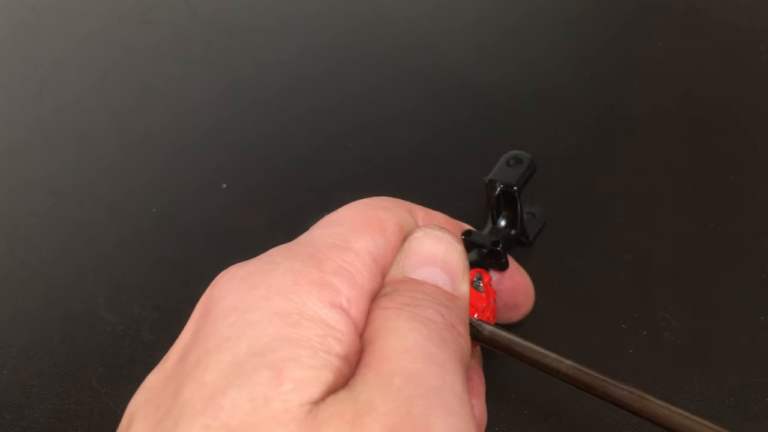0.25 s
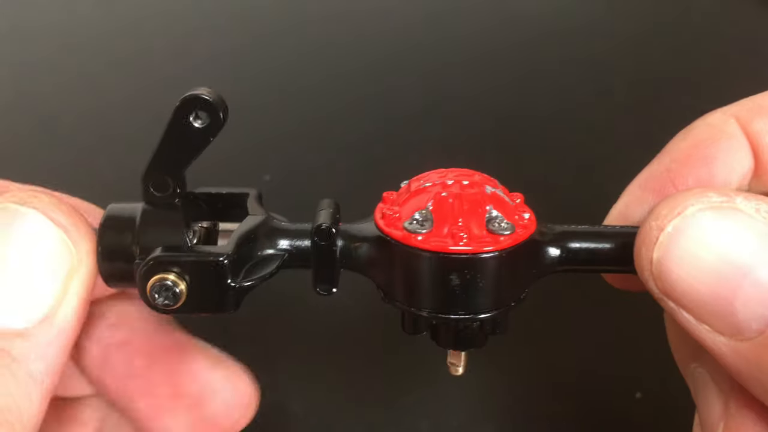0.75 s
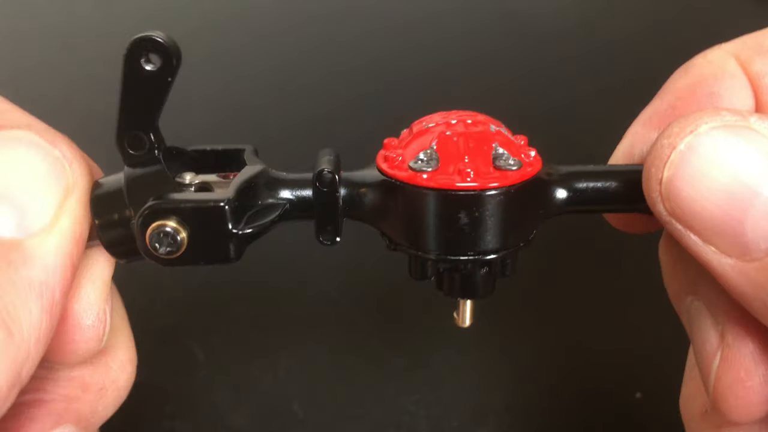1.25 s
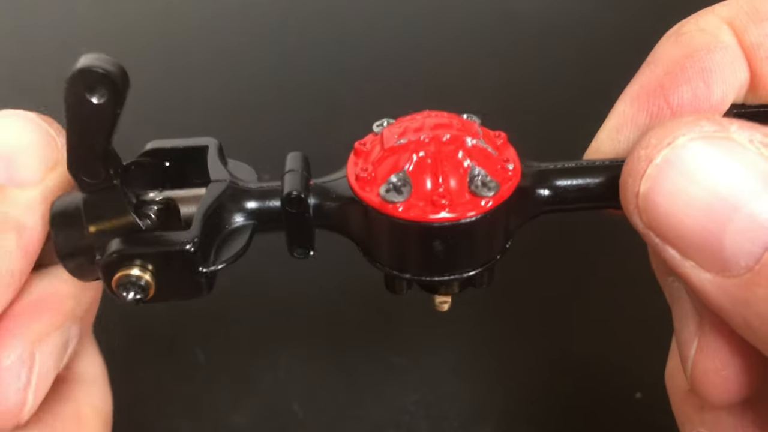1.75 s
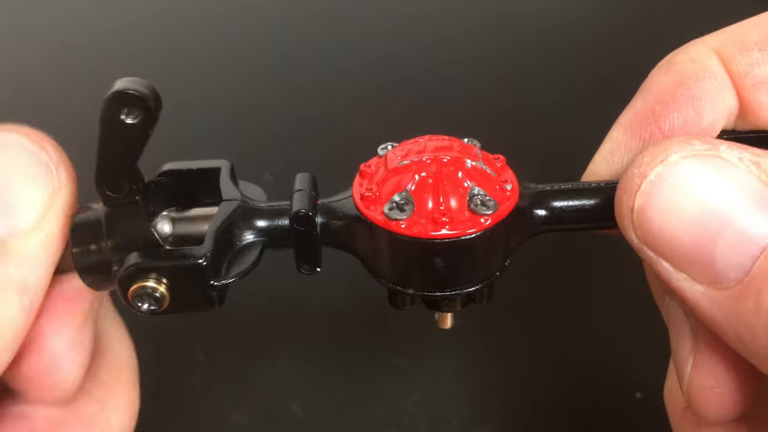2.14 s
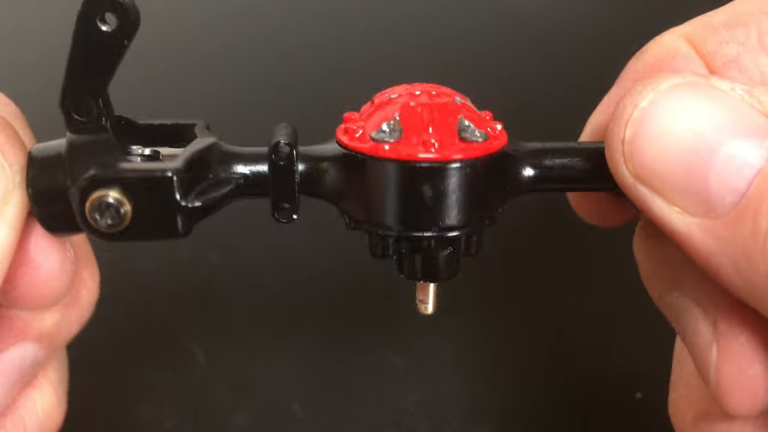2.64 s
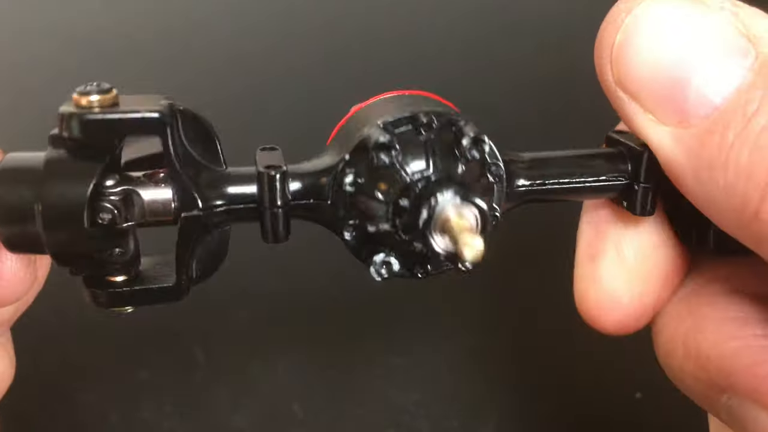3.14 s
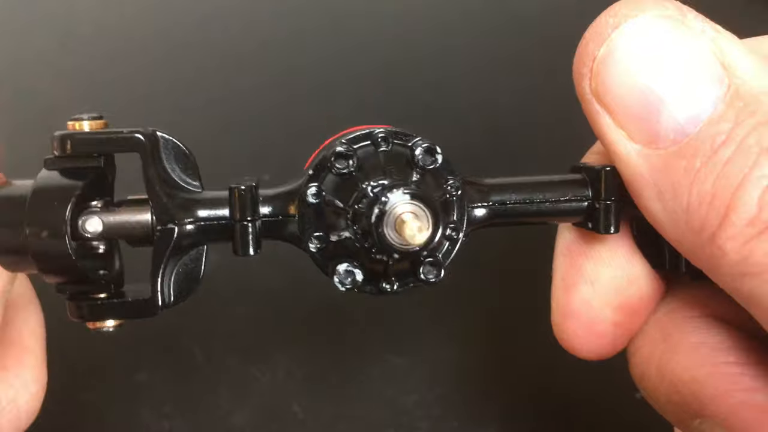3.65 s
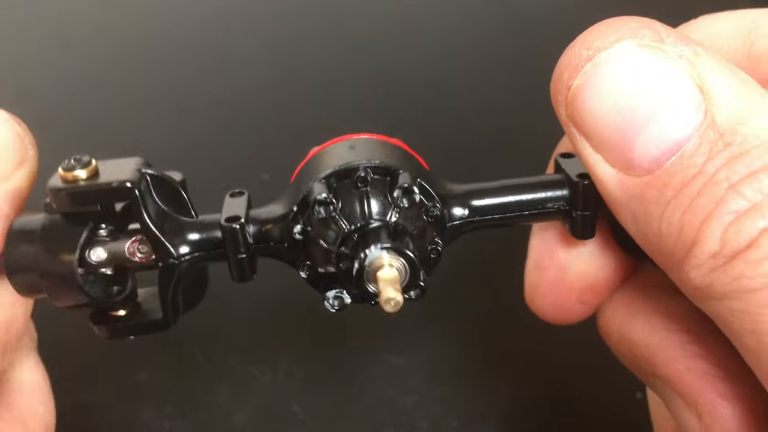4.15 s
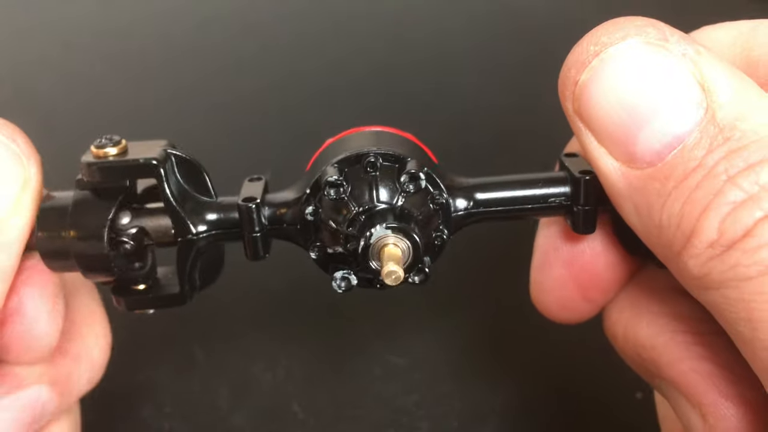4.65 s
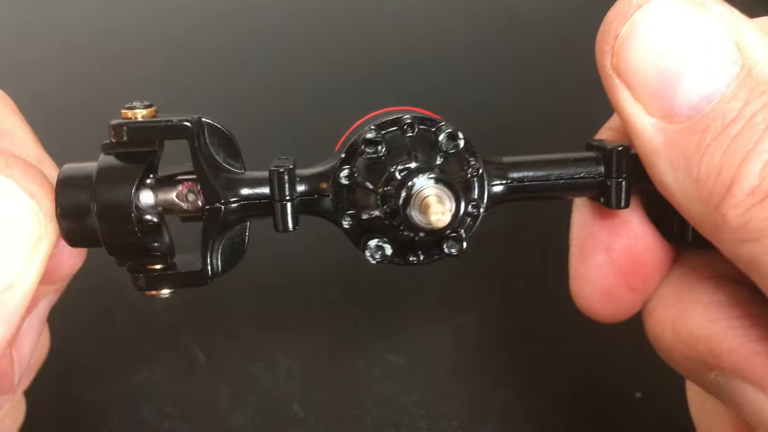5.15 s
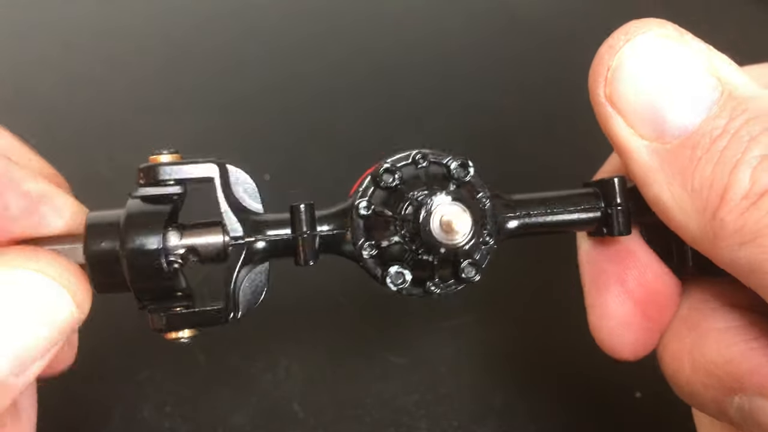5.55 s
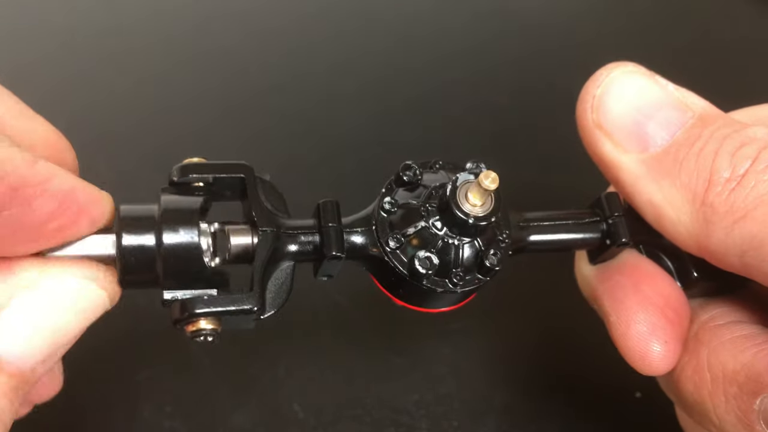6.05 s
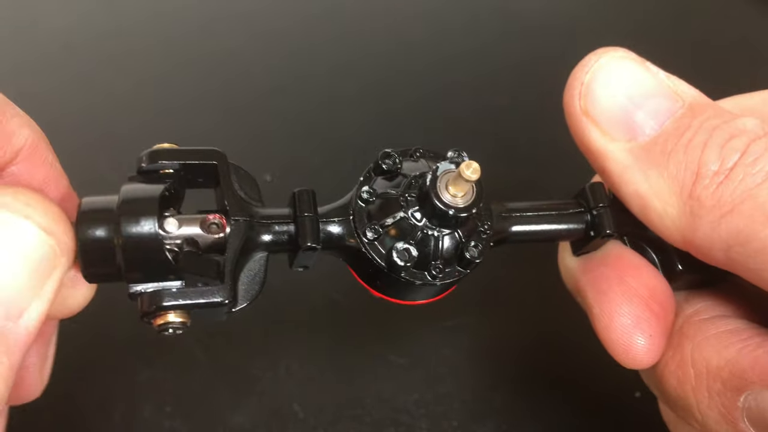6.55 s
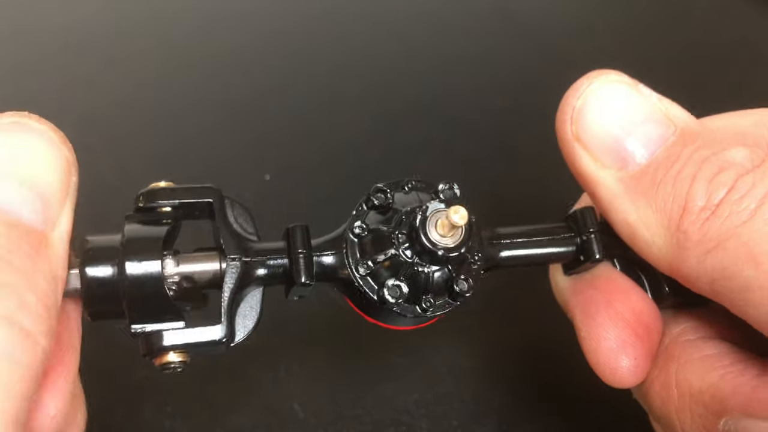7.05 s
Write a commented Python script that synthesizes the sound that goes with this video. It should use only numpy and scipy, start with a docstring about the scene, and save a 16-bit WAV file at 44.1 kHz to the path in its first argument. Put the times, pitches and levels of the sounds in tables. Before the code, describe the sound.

Small gears in a hand-held model axle click sharply in uneven bursts as fingers twist the shaft back and forth.

```python
"""In a quiet room, fingers twist the shaft of a small model axle to and fro, close to a microphone.
The loose joint and gears knock at every tooth, and each knock rings the housing, cover, shaft and pins.
Hard knocks also send a low jolt through the hands. Between knocks, sliding teeth make a fine rasp.
The room echoes faintly, over a soft hiss and a low rumble from the hands."""
import sys
import numpy as np
from scipy import signal
from scipy.fft import rfft, irfft, next_fast_len
from scipy.io import wavfile
from scipy.ndimage import map_coordinates

SR = 44100
rng = np.random.default_rng(int(sys.argv[2]) if len(sys.argv) > 2 else 0)


def to_wav(sig):
    """Store sig (one row per channel, or 1-D mono) as 16-bit WAV at the path in sys.argv[1].

    Samples outside -1..1 are clipped; the rate is SR.
    """
    pcm = np.clip(np.atleast_2d(sig), -1, 1) * 32767
    pcm = np.round(pcm).astype(np.int16)
    wavfile.write(sys.argv[1], SR, pcm.T)  # frames by channels


N = 322361

# Room tone and microphone hiss: (frequency [Hz], relative level [dB])
HISS_SPECTRUM = [(35, -20), (60, -3), (380, -15), (698, -20.5), (1170, -22), (1310, -24), (2410, -25.5),
                 (3760, -27), (7940, -29), (12700, -25.5), (16000, -26)]
# How deep the hands' rumble is: (frequency [Hz], relative level [dB])
RUMBLE_SPECTRUM = [(18, -57), (42, 11.5), (75, -1.5), (160, -21.5), (400, -58), (2000, -55)]
# How that rumble swells and sinks: (time [s], relative level [dB])
RUMBLE_LEVELS = [(0.0, -82.5), (2.61, -78.5), (4.46, -90), (4.58, -77.5), (5.6, -90), (5.96, -87),
                 (7.31, -78.5)]
# How long the room rings: (frequency [Hz], time to fade by 60 dB [s])
ROOM_FADES = [(300, 0.83), (2500, 0.44), (9000, 0.31), (16000, 0.2)]
# First echoes off the walls: (delay [s], level [dB])
WALL_ECHOES = [(0.0145, -32), (0.0165, -51), (.0236, -61), (0.0278, -58)]
# The tones each part rings with: (frequency [Hz], relative level [dB], time to fade by 60 dB [s])
HOUSING_TONES = [(362, -16, 0.016), (747, -9.5, 0.016), (1082, 0.5, 0.0076), (1310, -1, 0.015),
                 (2256, -6, 0.039), (2416, -1, 0.019), (2566, 12, 0.0087), (2878, 11, 0.0064),
                 (3154, 16.5, 0.0049), (3464, -0.5, 0.0055), (3940, -26, 0.007)]
COVER_TONES = [(5870, -7, 0.0087), (6530, -15.5, 0.0045), (6470, -4, 0.0066), (6820, 1.5, 0.003)]
SHAFT_TONES = [(9450, -7.5, 0.00056), (8920, -1, 0.0062), (8940, -44.5, 0.013), (9170, -10, 0.0081),
               (9426, -0.5, 0.0082), (11050, -6.5, 0.0008)]
PIN_TONES = [(12020, -27.5, 0.0054), (11800, -4, 0.0025), (12210, 10.5, 0.0034), (13720, 1, 0.0024),
             (13700, -5.5, 0.0094), (13300, 0, 0.01), (14550, 7, 0.0075), (14000, 2, 0.00048)]
# How the grip shapes the housing's ring and the jolt: (time [s], tilt of high tones to the treble [dB],
# boost of low tones [dB], lingering rattle [dB], typical starting pitch of a jolt [Hz])
GRIP_CHANGES = [(.5, 13.5, 7.5, -12, 308), (1.6, 6, 6, -21, 324), (2.3, 6, 3, -43, 288),
                (2.75, 12, 10, -12.5, 261), (3.1, -13, 4, -21, 269), (3.7, 14, 3, -44, 420),
                (4.1, -5, -2, -43, 358), (4.5, 3, 0, -46, 217), (5.5, 2, 1.5, -27, 238),
                (6.4, -4, -3, -29, 210), (7.3, 2, 1, -32, 240)]
# How the held axle answers a medium knock: (time [s], housing [dB], cover [dB], jolt [dB])
MEDIUM_KNOCK_LEVELS = [(.5, -55, -47, -74), (.75, -48, -39.5, -78), (1.1, -45.5, -37, -58),
                       (1.7, -43, -38, -56), (2.2, -47, -37.5, -62.5), (2.7, -43.5, -39, -51),
                       (3.05, -47, -42.5, -50), (3.5, -45.5, -40.5, -57.5), (3.8, -37, -39.5, -58),
                       (4.1, -43.5, -41.5, -60.5), (4.45, -42.5, -38, -62), (4.9, -39.5, -37, -53),
                       (5.4, -42.5, -40.5, -51), (5.8, -42, -41, -52), (6.2, -45, -41.5, -55.5),
                       (6.45, -41, -41, -47.5), (6.54, -43.5, -45, -58), (6.9, -43.5, -43.5, -60),
                       (7.3, -40.5, -42.5, -68)]
# Gear teeth sliding: (start [s], length [s], housing level [dB], cover and shaft level [dB])
TOOTH_SLIDES = [(1.66, 0.279, -75, -69.5), (2.087, 0.18, -77, -72), (3.39, 0.25, -79, -77.5),
                (3.94, 0.27, -71, -73), (4.428, 0.075, -63, -64), (4.54, 0.077, -79, -78),
                (5.054, 0.15, -69, -70), (5.23, 0.11, -67, -70), (6.122, 0.048, -73, -66),
                (6.52, 0.066, -62.5, -60), (6.744, 0.16, -68.5, -69.5)]
# Every knock: (time [s], strength in shaft and pins together [dB], the pins' share of that energy [0-1])
GEAR_KNOCKS = [(0.4594, -56.5, 0.77), (0.6124, -57.5, 0.8), (0.709, -35.5, 0), (0.7114, -35.5, 0.4),
               (0.7158, -34, 0.3), (0.722, -27, 0.12), (0.728, -42, 0.14), (0.7345, -35, 0.13),
               (0.742, -45, 0.12), (0.7515, -55, 0.7), (0.9586, -61, 0.38), (0.9647, -61, 0.6),
               (1.0078, -40.5, 0.3), (1.011, -46, 0.3), (1.0203, -43.5, 0), (1.133, -26.5, 0.18),
               (1.142, -30, 0.31), (1.152, -41, 0.3), (1.1865, -22, 0.38), (1.3238, -20.5, 0.47),
               (1.3611, -24.5, 0.44), (1.4738, -27, 0.6), (1.5955, -23, 0.6), (1.601, -27.5, 0.25),
               (1.622, -31.5, 0), (1.6382, -49, 0.5), (1.65, -36.5, 0.22), (1.6733, -42, 0.17),
               (1.6787, -46.5, 0.32), (1.7145, -61, 0.04), (1.72, -50.5, 0.2), (1.744, -49, 0.44),
               (1.8014, -73, 0.26), (1.827, -68, 0.25), (2.0815, -65, 0.7), (2.1272, -63, 0.27),
               (2.1498, -55.5, 0.13), (2.1642, -61, 0.37), (2.1766, -48.5, 0.29), (2.203, -49, 0.1),
               (2.242, -46, 0.58), (2.2453, -35.5, 0.14), (2.256, -44, 0.35), (2.274, -48, 0.25),
               (2.2807, -39, 0.19), (2.3227, -40.5, 0.1), (2.3322, -29, 0.18), (2.37, -42, 0.4),
               (2.4229, -31, 0.36), (2.436, -45, 0.32), (2.5346, -31, 0.35), (2.6692, -23.5, 0.86),
               (2.706, -28, 0.85), (2.8256, -30.5, 0.68), (2.9811, -24, 0.68), (3.0202, -32, 0.4),
               (3.031, -41, 0.37), (3.044, -45, 0.6), (3.051, -46, 0.38), (3.059, -45, 0.19),
               (3.0637, -45, 0.14), (3.425, -67, 0.1), (3.4421, -50, 0.7), (3.481, -55.5, 0.61),
               (3.523, -41, 0.44), (3.5645, -31, 0.17), (3.5858, -36, 0.4), (3.61, -25.5, 0.37),
               (3.6168, -40, 0.6), (3.6738, -21.5, 0.76), (3.7711, -26, 0.7), (3.825, -26.5, 0.58),
               (3.8934, -26, 0.81), (3.9152, -34.5, 0.45), (3.9284, -52, 0.43), (3.9599, -36.5, 0.4),
               (3.9846, -43, 0.6), (3.9969, -38, 0.5), (4.029, -48, 0.6), (4.0335, -43, 0.3),
               (4.051, -59, 0.73), (4.09, -60, 0.6), (4.1172, -52, 0.45), (4.4413, -58, 0.19),
               (4.454, -59, 0.5), (4.483, -65, 0.47), (4.4996, -56.5, 0.5), (4.539, -44, 0.6),
               (4.543, -37, 0.6), (4.5565, -43.5, 0.46), (4.5797, -42, 0.68), (4.5848, -38, 0.2),
               (4.6129, -44, 0.18), (4.618, -32.5, 0.25), (4.6307, -43, 0.17), (4.6512, -30, 0.23),
               (4.7286, -27.5, 0.7), (4.854, -25.5, 0.8), (4.867, -28, 0.88), (4.9048, -28.5, 0.6),
               (4.972, -29.5, 0.49), (5.017, -37, 0.56), (5.0275, -49, 0.18), (5.058, -44.5, 0.3),
               (5.0915, -40, 0.58), (5.1, -51, 0), (5.111, -54, 0.3), (5.216, -60, 0.7), (5.2724, -54, 0.7),
               (5.3104, -58, 0.8), (5.331, -52, 0.6), (5.3629, -50, 0.7), (5.3767, -37, 0.33),
               (5.442, -43, 0.5), (5.4485, -28.5, 0.36), (5.483, -29.5, 0.8), (5.529, -29, 0.37),
               (5.628, -20.5, 0.95), (5.6554, -23, 0.98), (5.7028, -22, 0.9), (5.7543, -25.5, 0.4),
               (5.7872, -27, 0.35), (5.8027, -48, 0.1), (5.8252, -47, 0.1), (5.958, -63, 0),
               (6.1044, -61, 0.1), (6.134, -58, 0.42), (6.1465, -51, 0.4), (6.1577, -48, 0.34),
               (6.1617, -48, 0.2), (6.171, -49.5, 0.2), (6.253, -44.5, 0.36), (6.2567, -46, 0.4),
               (6.2838, -33.5, 0.17), (6.289, -41, 0.6), (6.3784, -27, 0.4), (6.4261, -21, 0.61),
               (6.4397, -25, 0.76), (6.472, -21.5, 0.57), (6.5145, -20, 0.77), (6.5164, -27, 0.7),
               (6.5245, -30, 0.3), (6.5292, -28, 0.5), (6.5354, -30, 0), (6.5554, -52, 0.25),
               (6.57, -55, 0.59), (6.795, -53, 0.31), (6.8153, -61, 0.07), (6.83, -53, 0.3),
               (6.8447, -42.5, 0.17), (6.866, -31.5, 0.07), (6.8955, -26, 0.12), (6.9305, -21, 0.43),
               (7.0951, -21.5, 0.6), (7.1433, -27.5, 0.63), (7.151, -41.5, 1), (7.2093, -27.5, 0.37),
               (7.2605, -25.5, 0.87), (7.2766, -27, 0.36), (7.283, -47, 0.16), (7.2978, -31, 0.1)]

MEDIUM_KNOCK_DB = -30
HOUSING_GROWTH, COVER_GROWTH, JOLT_GROWTH = 0.54, 0.69, 0.38  # dB per dB of strength: soft knocks are duller
SLIDE_RISE_S, SLIDE_FALL_S = 0.027, 0.013
TICKS_PER_S, CATCHES_PER_S, CATCH_BOOST_DB = 1500, 60, 15.5


def amp(db):
    """Turn decibels into a number to multiply by."""
    return 10 ** (np.asarray(db) / 20)


def unit(x):
    """Scale a sound to an average power of 1."""
    return x / np.sqrt(np.mean(x ** 2) + 1e-20)


def along(points, hz):
    """Read between the rows of a frequency table, with octaves evenly spaced."""
    frequencies, values = np.transpose(points)
    return np.interp(np.log(hz + 1), np.log(frequencies + 1), values)


def filtered(x, response):
    """Turn each frequency up or down by response(hz)."""
    size = next_fast_len(N + SR // 2)
    return irfft(rfft(x, size) * response(np.fft.rfftfreq(size, 1 / SR)), size)[..., :N]


def add(track, s, sound):
    """Mix a sound in at s seconds."""
    track[round(s * SR):][:len(sound)] += sound


def hiss():
    """The room and the microphone give a soft, steady noise."""
    return amp(-68.5) * unit(filtered(rng.standard_normal(N), lambda hz: amp(along(HISS_SPECTRUM, hz))))


def hand_rumble(lumps_per_s=15):
    """The hands make a low rumble that swells unevenly."""
    t = np.arange(N) / SR
    lumps = map_coordinates(rng.standard_normal(N * lumps_per_s // SR + 4), [t * lumps_per_s])
    low_noise = filtered(rng.standard_normal(N), lambda hz: amp(along(RUMBLE_SPECTRUM, hz)))
    level_db = np.interp(t, *np.transpose(RUMBLE_LEVELS)) + 5.5
    return amp(level_db) * unit(low_noise * amp(4.5 * lumps))


def room_ring(x, delay_s=0.0044):
    """Each frequency fades at its own speed; the axle moves, so the room's answer keeps changing."""
    out, step = np.zeros(N + SR), SR // 10
    for start in range(0, N, step):
        hz, t, noise = signal.stft(rng.standard_normal(SR // 3), SR, nperseg=256)
        fade = amp(-60 * t / along(ROOM_FADES, hz)[:, None])
        tail = signal.istft(noise * fade, SR, nperseg=256)[1]
        tail /= np.linalg.norm(tail)
        add(out, start / SR + delay_s, signal.fftconvolve(x[start:start + step], tail))
    return out[:N]


def wall_echoes(x):
    """The walls send back faint, late copies of the sound."""
    return sum(amp(db) * np.pad(x, (round(s * SR), 0))[:N] for s, db in WALL_ECHOES)


def grip(s):
    """The grip's tilt, low boost, rattle and jolt pitch at s seconds."""
    times, *columns = np.transpose(GRIP_CHANGES)
    return [np.interp(s, times, column) for column in columns]


def knock_levels(s, strength_db):
    """Housing, cover and jolt levels in dB for a knock of this strength at s seconds."""
    times, *parts = np.transpose(MEDIUM_KNOCK_LEVELS)
    return [np.interp(s, times, db) + growth * (strength_db - MEDIUM_KNOCK_DB)
            for db, growth in zip(parts, (HOUSING_GROWTH, COVER_GROWTH, JOLT_GROWTH))]


def jolts(end_hz=55):
    """A bending wave reaches the microphone through hands and table: high pitches first, low ones late."""
    out, t = np.zeros(N + SR), np.arange(3000) / SR
    for s, strength_db, _ in GEAR_KNOCKS:
        *_, typical_hz = grip(s)
        *_, jolt_db = knock_levels(s, strength_db)
        start_hz = typical_hz * amp(1.5 * rng.standard_normal())
        hz = end_hz + (start_hz - end_hz) * np.exp(-t / 0.0082)
        age = t * start_hz / 1.83  # a higher jolt is also a shorter one
        swell = age * np.exp(1 - age)
        add(out, s, amp(jolt_db) * swell * np.sin(2 * np.pi * np.cumsum(hz) / SR))
    return out[:N]


def ring(tones, chatter, tilt_db=0, low_db=0, scatter_db=2.5, detune=0.015):
    """A struck part rings; its tones shift in level and pitch with where it is hit and held."""
    hz, db, fade_s = np.transpose(tones)[..., None]
    t = np.arange(1500) / SR
    level_shift, pitch_shift = rng.standard_normal((2, len(tones), 1))
    grip_db = np.where(hz > 1800, tilt_db * np.tanh(3 * np.log2(hz / 2600)), low_db)
    db = db + scatter_db * level_shift + grip_db
    waves = np.sin(2 * np.pi * hz * (1 + detune * pitch_shift) * t)
    ringing = np.sum(amp(db - 60 * t / fade_s) * waves, axis=0)
    onset = (1 - np.exp(-t / 0.000077)) ** 2  # the force takes a moment to spread
    sound = signal.fftconvolve(ringing * onset, chatter)
    return sound / np.sqrt(np.mean(sound[:120] ** 2))  # power of 1 just after contact


def tooth_rasp():
    """Sliding teeth shed tiny uneven ticks, and now and then catch, ringing housing, cover and shaft."""
    t = np.arange(N) / SR
    chance = rng.random(N) * SR
    size = (chance < TICKS_PER_S) + amp(CATCH_BOOST_DB) * (chance < CATCHES_PER_S)
    ticks = size * rng.standard_normal(N) * amp(3.1 * rng.exponential(size=N))
    clean_tap = dict(chatter=[1], scatter_db=0, detune=0)
    housing = ring(HOUSING_TONES, tilt_db=-8, low_db=-18, **clean_tap)
    cover_and_shaft = ring(COVER_TONES, **clean_tap) + amp(-1) * ring(SHAFT_TONES, **clean_tap)
    levels = np.zeros((2, N))
    for s, length, *db in TOOTH_SLIDES:
        corners = [s - SLIDE_RISE_S, s, s + length, s + length + SLIDE_FALL_S]
        levels += amp(db)[:, None] * np.interp(t, corners, [0, 1, 1, 0])
    return sum(level * unit(signal.fftconvolve(ticks, part)[:N])
               for level, part in zip(levels, (housing, cover_and_shaft)))


def gear_knocks(peak_s=0.00045):
    """Metal meets metal in a millisecond of chatter; the loose parts then rattle faintly to rest."""
    out, t = np.zeros(N + SR), np.arange(5000) / SR
    blow = t / peak_s * np.exp(1 - t / peak_s)
    metal_force = blow + amp(-18 - 60 * t / 0.042) + amp(-27 - 60 * t / 0.051)
    for s, strength_db, pin_share in GEAR_KNOCKS:
        housing_db, cover_db, _ = knock_levels(s, strength_db)
        tilt_db, low_db, rattle_db, _ = grip(s)
        grit = rng.standard_normal(len(t)) * amp(5 * rng.standard_normal(len(t)))
        # the hollow housing settles last
        housing_force = blow + amp(9 - 60 * t / 0.018) + amp(rattle_db - 60 * t / 0.36)
        add(out, s, amp(housing_db) * ring(HOUSING_TONES, housing_force * grit, tilt_db, low_db))
        chatter = metal_force * grit
        add(out, s, amp(cover_db) * ring(COVER_TONES, chatter))
        add(out, s, amp(strength_db) * np.sqrt(1 - pin_share) * ring(SHAFT_TONES, chatter))
        add(out, s, amp(strength_db) * np.sqrt(pin_share) * ring(PIN_TONES, chatter))
    return out[:N]


def scene():
    """Mix the nearby axle, its echoes and the background into one channel."""
    axle = gear_knocks() + tooth_rasp()
    echoes = wall_echoes(axle) + amp(-22) * room_ring(axle)
    return (axle + echoes + jolts() + hiss() + hand_rumble())[None]


def record(dry):
    """Cut away the very highest treble."""
    top_hz = 16500
    return filtered(dry, lambda hz: 1 / (1 + (hz / top_hz) ** 120))


dry = scene()
out = record(dry)
to_wav(out)
```